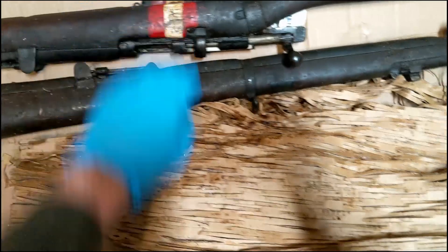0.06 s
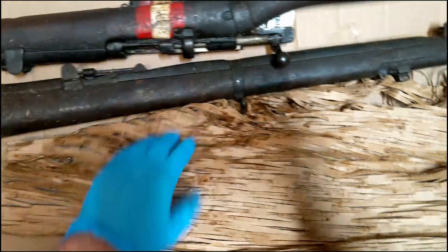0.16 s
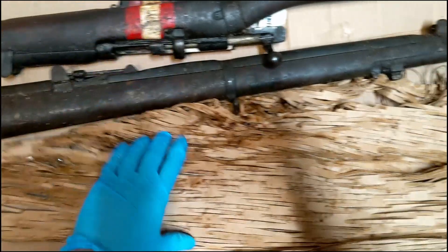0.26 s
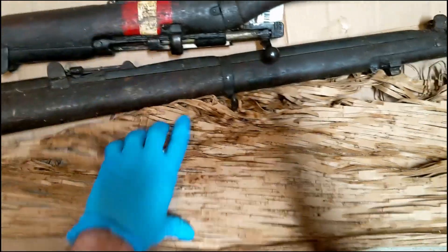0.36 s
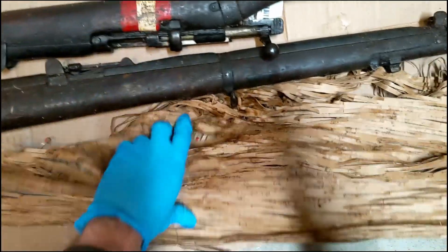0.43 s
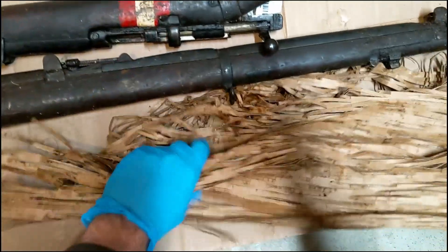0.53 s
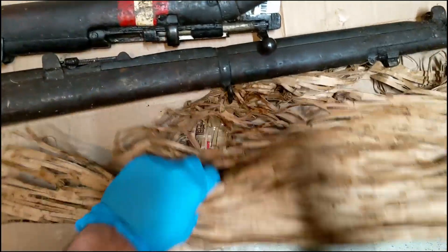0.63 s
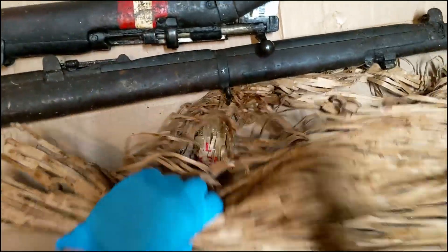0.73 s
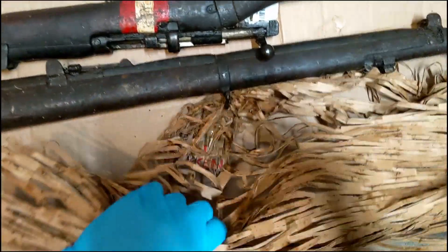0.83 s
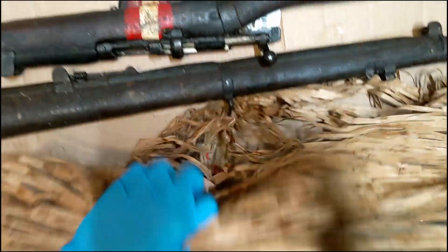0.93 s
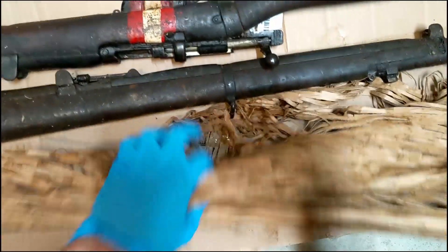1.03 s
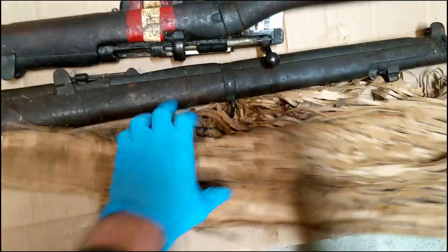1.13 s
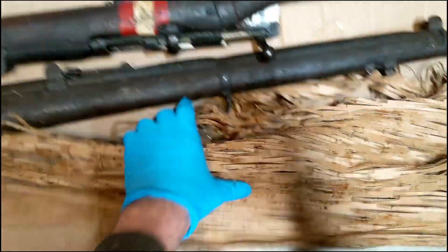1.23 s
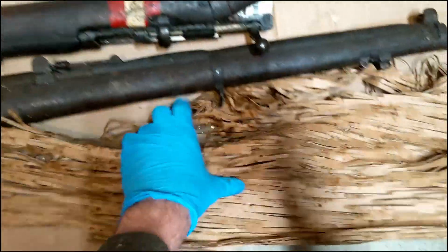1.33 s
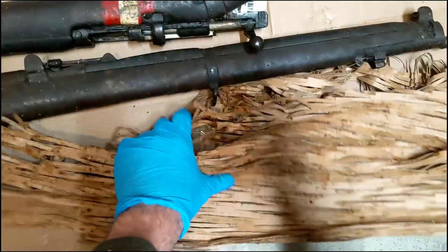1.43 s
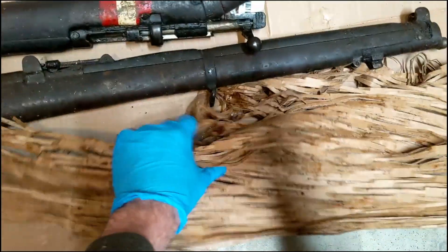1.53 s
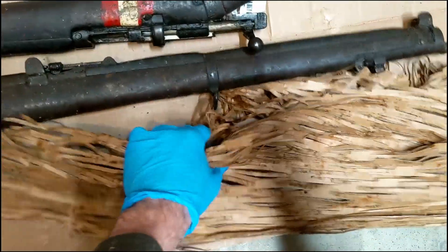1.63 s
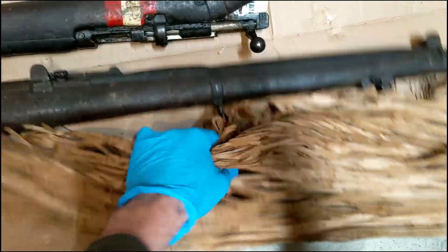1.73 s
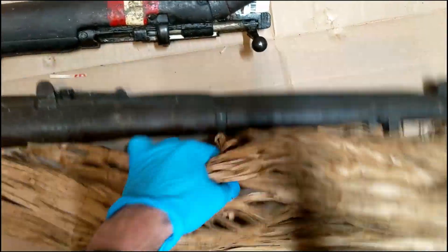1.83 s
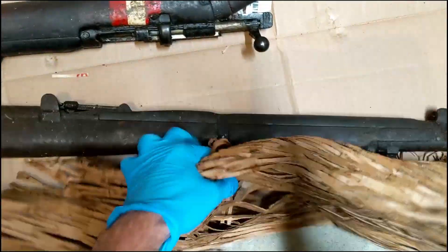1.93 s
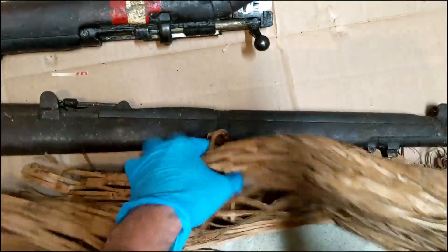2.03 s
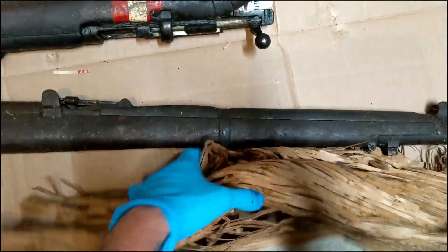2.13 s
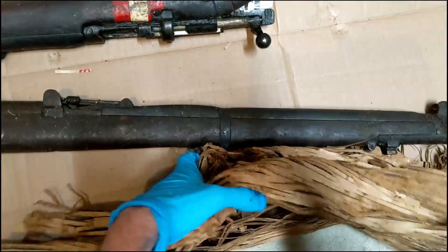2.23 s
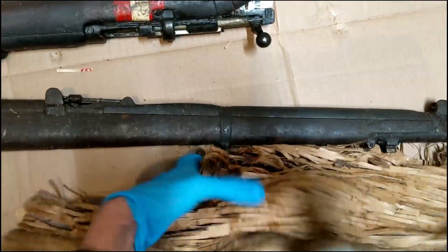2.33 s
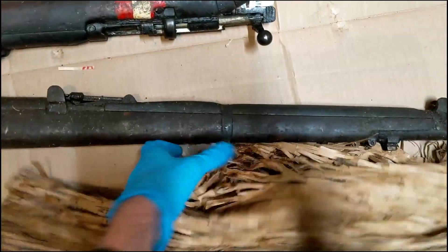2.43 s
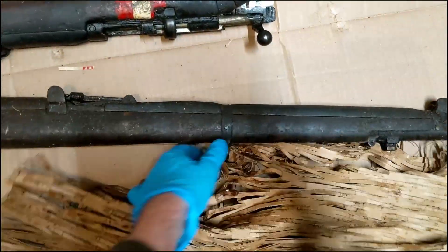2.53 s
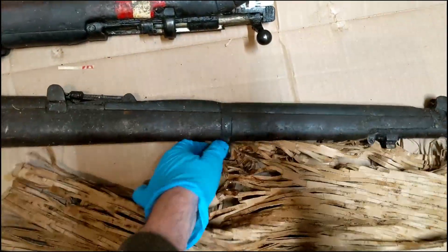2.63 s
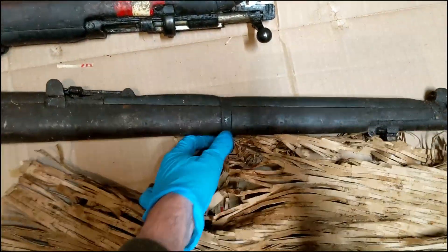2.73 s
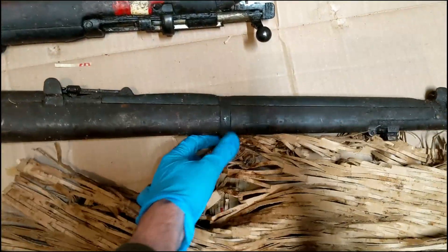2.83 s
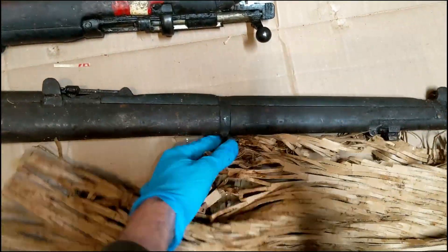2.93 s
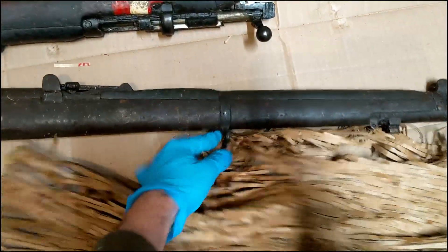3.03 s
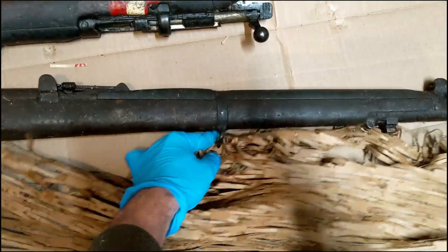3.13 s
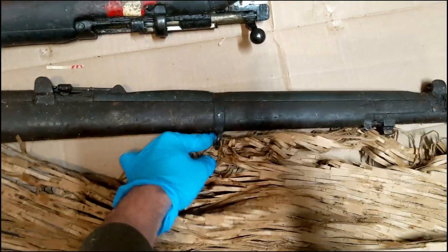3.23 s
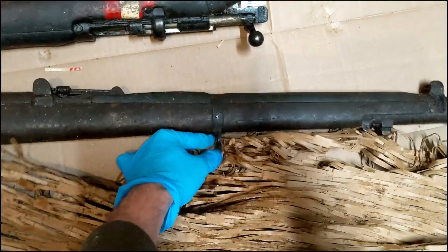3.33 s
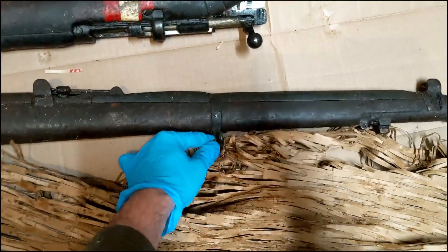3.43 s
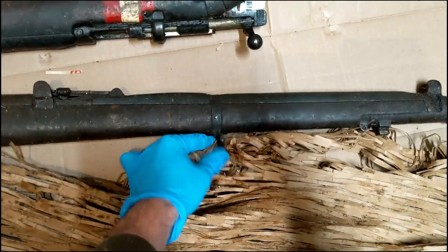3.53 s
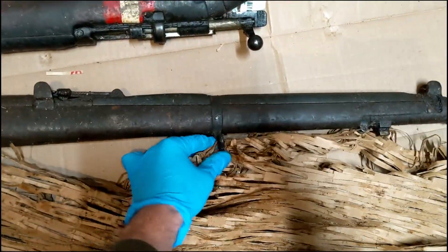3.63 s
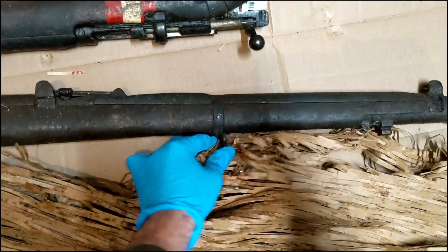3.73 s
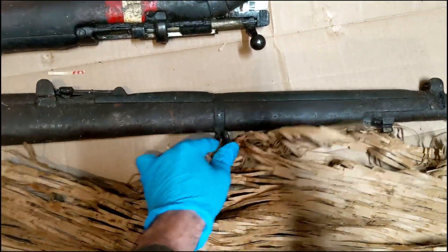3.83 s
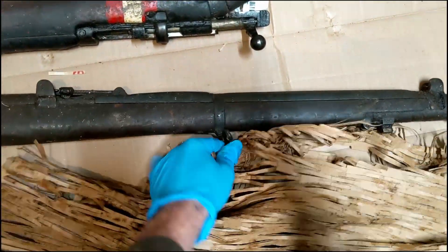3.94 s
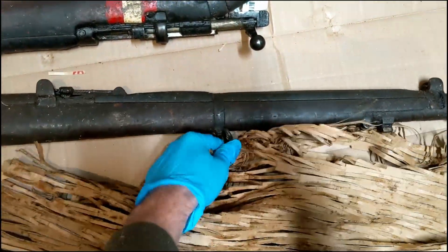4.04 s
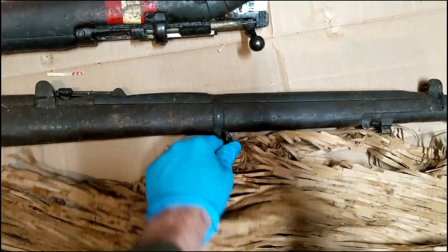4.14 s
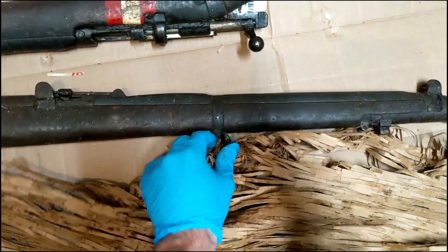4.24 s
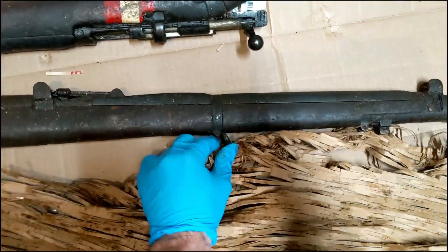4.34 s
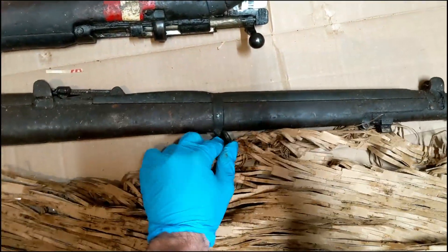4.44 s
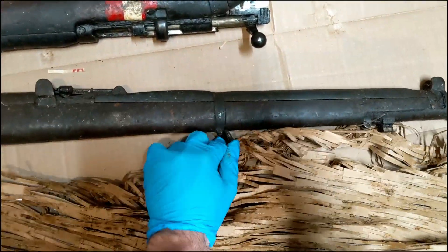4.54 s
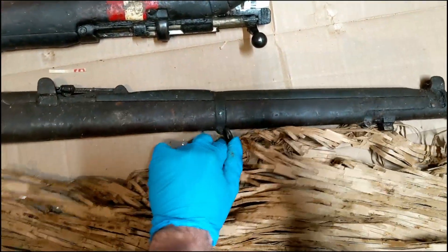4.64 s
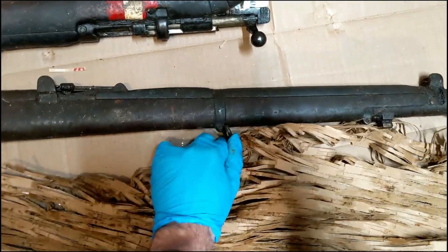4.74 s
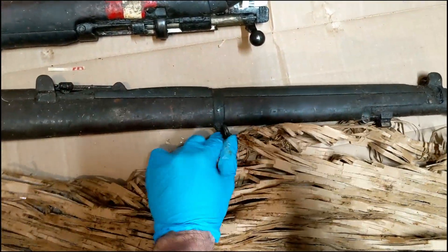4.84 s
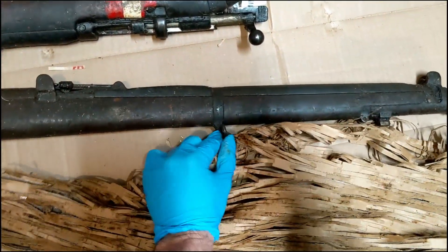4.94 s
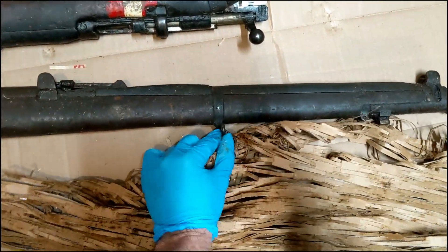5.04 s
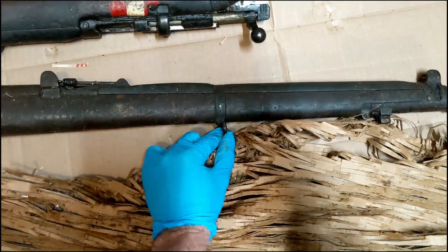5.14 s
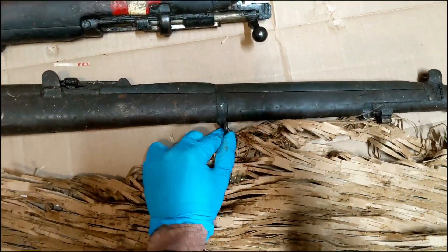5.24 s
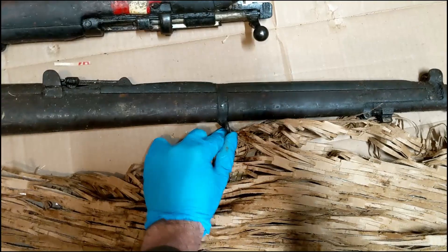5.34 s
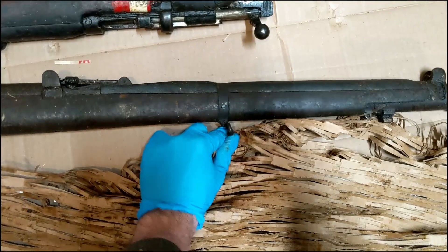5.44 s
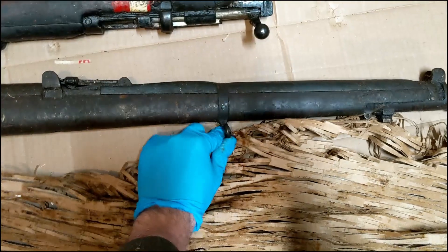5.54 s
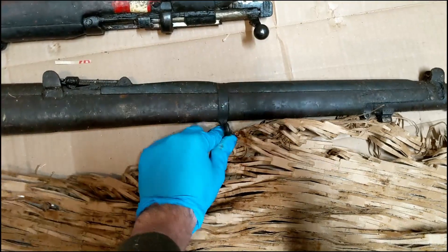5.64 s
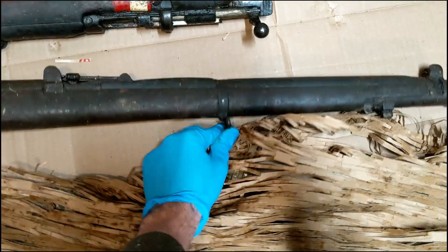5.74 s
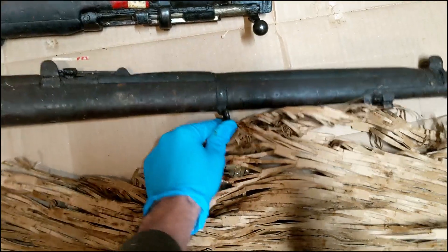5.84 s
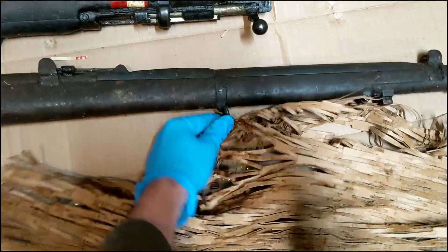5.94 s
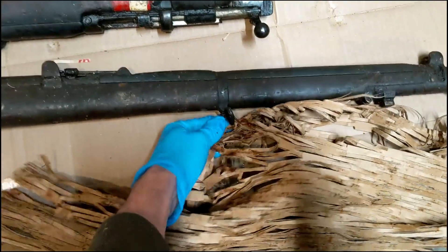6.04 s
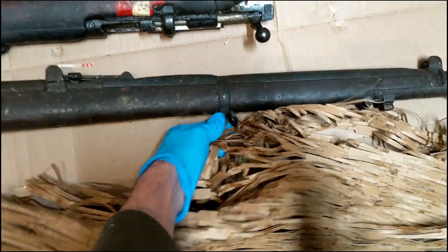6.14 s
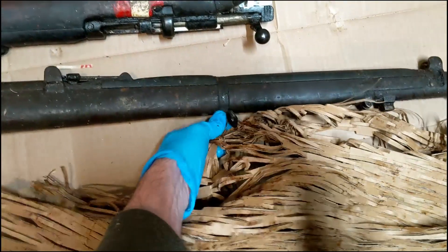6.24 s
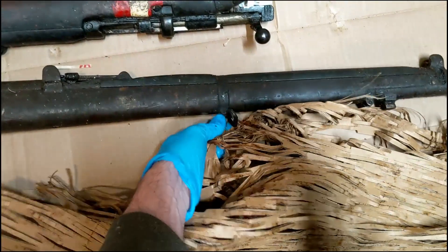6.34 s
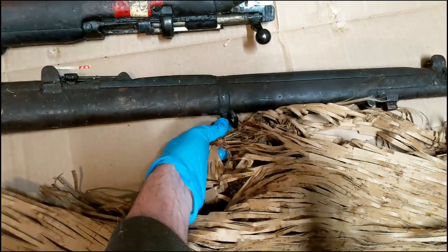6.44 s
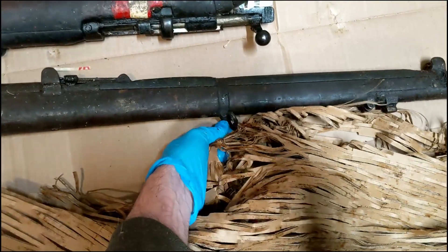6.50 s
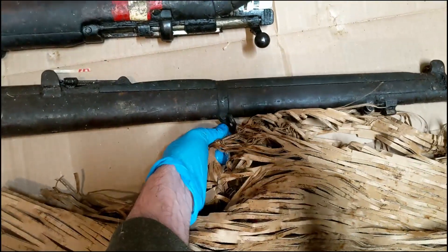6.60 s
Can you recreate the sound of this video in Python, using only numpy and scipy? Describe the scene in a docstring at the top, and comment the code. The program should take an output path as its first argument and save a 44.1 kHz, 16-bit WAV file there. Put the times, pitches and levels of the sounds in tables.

```python
"""A gloved hand pulls and pushes shredded paper packing over a cardboard sheet, near two microphones.
Strips first rustle softly over a low room rumble, a hum and a brief faint tone. At half a second they
whisper, crinkle, scuff and snap as the bundle drags and thuds on the cardboard. The loudest snaps come
near 1.7 s, then lighter strokes follow. After a lull, a sharp stroke lands near 4 s, with a second hum
now faintly there. A last busy patch comes near 6 s. The microphone housing colours it all."""
import sys
import numpy as np
from scipy import signal
from scipy.io import wavfile

SR = 44100
rng = np.random.default_rng(int(sys.argv[2]) if len(sys.argv) > 2 else 0)


def master_out(mix):
    """Clip the mix to full scale and print it as 16-bit PCM to the path in sys.argv[1]."""
    frames = np.transpose(np.atleast_2d(mix))
    ceiling = np.clip(frames, -1, 1)
    pcm = np.round(ceiling * 32767).astype(np.int16)
    wavfile.write(sys.argv[1], SR, pcm)


N = 294147


def from_db(db):
    """Turn decibels into a number to multiply by."""
    return 10 ** (np.asarray(db) / 20)


def unit_level(x):
    """Scale a sound so its average level (rms) is 1."""
    return x / np.sqrt(np.mean(x ** 2) + 1e-20)


def in_time(rows):
    """Join a table's rows with straight lines: one curve for each column after the time."""
    times_s, *columns = np.transpose(rows)
    return [np.interp(np.arange(N) / SR, times_s, column) for column in columns]


def at_hz(rows, hz):
    """Look up a table's value at a pitch, sliding between its rows."""
    pitches_hz, values = np.transpose(rows)
    return np.interp(np.log(hz), np.log(pitches_hz), values)


def drift(rate_hz):
    """A smooth random wander, about 1 in size; a higher rate wanders faster."""
    step = 40   # samples between points
    keep = np.exp(-2 * np.pi * rate_hz * step / SR)
    noise = rng.standard_normal(N // step + 2002)
    slow = signal.lfilter([1], [1, -2 * keep, keep * keep], noise)[2000:]
    return np.interp(np.arange(N) / step, np.arange(len(slow)), unit_level(slow))


def resonance(x, hz, width_hz):
    """Let through the part of a sound near one pitch, so it rings there."""
    r = np.exp(-np.pi * width_hz / SR)
    feedback = [1, -2 * r * np.cos(2 * np.pi * hz / SR), r * r]
    return signal.lfilter(np.array([1, 0, -1]) * (1 - r * r) / 2, feedback, x)


def pan(left_over_right_db):
    """Left and right gains that lean a sound to one side."""
    return from_db(left_over_right_db * np.array([[.5], [-.5]]))


def add(out, start_s, sound):
    """Mix a short sound in at a moment."""
    i = round(start_s * SR)
    out[:, i:i + sound.shape[-1]] += sound[..., :N - i]


# How alike the two microphones sound. Columns: pitch_hz, likeness (0 unrelated, 1 the same)
LIKENESS = [(30, 0.98), (60, 0.92), (130, 0.77), (640, 0.65), (1410, 0.86), (3100, 0.024), (6820, 0.0)]
# Which side is louder. Columns: pitch_hz, left_over_right_db
BALANCE = [(60, -2), (480, 0), (950, 4.5), (1890, -4.5), (3770, -2), (7520, 0), (15000, -3)]

def shaped_noise(colour, envelope, flicker_db, tilt_db=0):
    """Stereo noise in bands that each flicker; tilt_db brightens it by that much per octave."""
    low_hz, high_hz = colour[0][0], colour[-1][0]
    edges = np.geomspace(low_hz, high_hz, int(3 * np.log2(high_hz / low_hz)) + 2)
    out, white = 0, envelope * rng.standard_normal((2, 2, N))
    for k, (low, high) in enumerate(zip(edges, edges[1:])):
        band = signal.butter(2, [low, high], "band", fs=SR, output="sos")
        mid, side = signal.sosfilt(band, white[k % 2])   # neighbouring bands get unrelated noise
        hz = np.sqrt(low * high)
        octaves = np.log2(hz / np.sqrt(low_hz * high_hz))
        gain = from_db(at_hz(colour, hz) + flicker_db * drift(10.6) + tilt_db * octaves)
        alike = at_hz(LIKENESS, hz)
        stereo = np.sqrt(1 + alike) * mid + np.sqrt(1 - alike) * side * [[1], [-1]]
        out = out + gain * pan(at_hz(BALANCE, hz)) * stereo
    return out / np.sqrt(np.mean(out.mean(0) ** 2))


# The tone of the room's rumble. Columns: pitch_hz, level_db
RUMBLE_COLOUR = [(18, -8), (32, 6), (45, -10.5), (112, -1), (165, -12.5), (251, -9), (398, -27), (483, -4),
                 (577, -29), (700, -24), (910, -12)]

def room_rumble():
    """The room gives a quiet, deep noise that never stops."""
    return from_db(-60) * shaped_noise(RUMBLE_COLOUR, envelope=1, flicker_db=-0.7)


# How loud the two hums are. Columns: time_s, lower_hum_db, upper_hum_db
HUM_LEVELS = [(0, -52, -85), (.45, -57, -86), (.6, -61, -95), (3.9, -61, -66), (4.2, -62, -62.5),
              (5.7, -62, -67), (5.9, -60, -70), (6.67, -59, -66)]
HUM_HZ, HUM_WIDTH_HZ = (48.6, 94.4), 19

def hums():
    """Two low hums waver: each is noise narrowed until it is almost one note."""
    out = 0
    for hz, level_db in zip(HUM_HZ, in_time(HUM_LEVELS)):
        narrow = resonance(rng.standard_normal(N), hz, HUM_WIDTH_HZ)
        out = out + from_db(level_db) * unit_level(resonance(narrow, hz, HUM_WIDTH_HZ))
    return out


# Strips settling between strokes. Columns: time_s, whisper_db, crinkle_db
SETTLING = [(0, -60.5, -52.5), (.2, -64.5, -56.5), (.7, -47, -50), (1.1, -49.5, -53), (1.38, -55, -54.5),
            (2.7, -55.5, -52), (3.3, -54, -52), (3.601, -71, -67), (3.73, -70, -77), (4.15, -53, -51),
            (4.55, -60, -60), (5.1, -60, -59.5), (5.65, -57.5, -57.5), (6.28, -52.5, -53),
            (6.67, -61, -60.5)]
# Strokes of the hand. Columns: full_strength_s, rise_s, hold_s, whisper_db, crinkle_db, drag_db,
# crinkle_tilt_db_per_octave
STROKES = [(0.266, 0.045, 0.29, -57, -58, -57, -6), (0.49, 0.028, .01, -39, -36, -57, 4),
           (0.573, 0.043, 0.015, -41, -38, -44.5, -1), (0.616, 0.037, 0.032, -38, -37.5, -37, 3),
           (0.927, 0.033, 0.034, -55.5, -42, -46.5, 9), (1.211, 0.12, 0.12, -44.5, -46.5, -46.5, -3),
           (1.427, 0.057, 0.12, -45, -43, -38.5, -1), (1.64, 0.21, 0.026, -41.5, -51, -42, 7),
           (1.707, 0.054, 0.062, -43.5, -38.5, -38, 6.5), (1.809, 0.24, .19, -34.5, -38, -37, 5.5),
           (2.017, .05, 0.069, -61, -42, -58, -7), (2.171, 0.12, 0.042, -43, -46.5, -49, 9),
           (2.251, 0.17, 0.053, -47, -44, -73, -8), (2.39, 0.04, 0.22, -47, -44.5, -59, -2),
           (2.774, 0.14, 0.033, -49, -46.5, -55.5, -5.5), (2.994, .02, 0.032, -45, -44.5, -75, -4),
           (3.111, 0.18, 0.089, -48, -43.5, -52.5, -7), (3.413, 0.086, 0.064, -53, -50.5, -55, -5),
           (3.533, 0.012, 0.026, -57, -55.5, -66, 8), (3.874, 0.16, 0.064, -45.5, -44.5, -51.5, -3),
           (3.951, 0.052, 0.0023, -40.5, -31.5, -38.5, -1), (4.03, 0.035, 0.022, -50, -45.5, -48.5, -12),
           (4.251, 0.064, 0.026, -50, -52, -50.5, 8), (5.038, 0.058, 0.035, -73, -55.5, -63, -4),
           (5.256, 0.12, 0.12, -61.5, -56.5, -64.5, -2), (5.396, 0.048, 0.1, -51.5, -48, -61, 1),
           (5.787, 0.038, 0.047, -59, -46.5, -56, -10), (5.868, 0.22, 0.075, -52, -46.5, -49, -1),
           (6.039, 0.08, 0.09, -45.5, -39, -47.5, -4.5), (6.183, 0.008, 0.012, -44.5, -44, -47, 11),
           (6.421, 0.035, 0.04, -51, -48, -58, -5.5)]
# Each trio is for whisper, crinkle, drag.
RISE_DB, FADE_DB_PER_S = (26, 22, 24.5), (108, 86, 131)
LET_GO_DB, LET_GO_S = (3.5, 4.5, 10), 0.032   # a quick extra drop as the grip eases

def hand():
    """Strokes rise, hold and fade. Gives whisper, crinkle and drag levels, and crinkle brightness."""
    t = np.arange(0, N, 32) / SR
    times_s, whisper_db, crinkle_db = np.transpose(SETTLING)
    resting_db = [np.interp(t, times_s, db) for db in (whisper_db, crinkle_db, whisper_db - 5.5)]
    power, brightness = from_db(resting_db) ** 2, 0
    for full_s, rise_s, hold_s, *levels_db, tilt_db in STROKES:
        rise_left = np.maximum(full_s - t, 0) / rise_s
        after_s = np.maximum(t - full_s - hold_s, 0)
        shape_db = -np.outer(RISE_DB, rise_left) - np.outer(FADE_DB_PER_S, after_s)
        shape_db -= np.outer(LET_GO_DB, 1 - np.exp(-after_s / LET_GO_S))
        stroke = from_db(shape_db + np.array(levels_db)[:, None]) ** 2
        power = power + stroke
        brightness = brightness + tilt_db * stroke[1]   # the loudest crinkle counts most
    curves = (*(10 * np.log10(power)), brightness / power[1])
    return [np.interp(np.arange(N) / SR, t, curve) for curve in curves]


def grains(per_s, spread_db, clump_db, fade_s):
    """The jumpy loudness of paper buckling: tiny bursts of uneven size that come in clumps."""
    born = rng.random(N) < per_s * from_db(clump_db * drift(30)) / SR
    powers = from_db(spread_db * np.minimum(rng.exponential(1, N), 5)) ** 2
    keep = np.exp(-2 / (fade_s * SR))
    return unit_level(np.sqrt(signal.lfilter([1], [1, -keep], born * powers + 1e-9)))


def strip_clicks(per_s, spread_db, cycles):
    """Lone strips click, each ringing briefly at one of 16 pitches with its own left-right place."""
    born = (rng.random(N) < per_s * from_db(4 * drift(8)) / SR) * rng.choice([-1, 1], N)
    sizes = born * from_db(spread_db * np.minimum(rng.exponential(1, N), 3))
    pitch_number, out = rng.integers(0, 16, size=N), np.zeros((2, N))
    for k, hz in enumerate(np.geomspace(1100, 13000, num=16)):
        ring = resonance(sizes * (pitch_number == k) + 1e-18, hz, hz / cycles)
        out += pan(rng.normal(-0.44, 2.8)) * ring * np.sqrt(cycles / hz)
    return unit_level(out)


HOLLOW_HZ, HOLLOW_DB, HOLLOW_WIDTH_HZ = (953, 1323), (-6, -15.5), 310

def hollow_sheet(roughness, drag_db, drag_tilt_db):
    """The rubbed cardboard rings at two flickering pitches, more strongly when the drag is dull."""
    out, rub = 0, roughness * rng.standard_normal(N)
    for hz, level_db in zip(HOLLOW_HZ, HOLLOW_DB):
        ring = unit_level(resonance(resonance(rub, hz, HOLLOW_WIDTH_HZ), hz, HOLLOW_WIDTH_HZ))
        out = out + from_db(drag_db + level_db - 0.3 * drag_tilt_db + 2.1 * drift(22)) * ring
    return out


# The tones of the four rubbing sounds. Columns: pitch_hz, level_db
WHISPER_COLOUR = [(3500, -28), (4800, 3.5), (6000, 2.5), (9000, 4.5), (16000, 7.5)]   # fine strips brushing
CRINKLE_COLOUR = [(1100, -7), (1700, 2), (2400, 6.5), (3400, 7.5), (4200, 1.5), (5500, -11)]   # stiffer folds buckling
DRAG_COLOUR = [(450, -53), (700, 3.5), (950, -3), (1300, 5), (2200, 4)]   # paper sliding on cardboard
PUSH_COLOUR = [(100, -6), (170, -12), (260, 3), (370, 0.5), (600, 1), (850, -5.5)]   # the whole bundle being shoved
# How the rubbing changes as the grip moves.
# Columns: time_s, whisper_tilt_db_per_octave, drag_tilt_db_per_octave, extra_push_db
GRIP = [(0, -6.5, 3, -0.5), (.6, -2, -4.5, 0), (1.3, -1.5, -10, 0.5), (1.8, -3, -1, -6), (2.5, -2.5, -4, 4),
        (3.9, -5, 0.5, -1), (4.8, -2, -4, 0.5), (5.25, -3.5, 5, 3), (6.2, -2, 3.5, -1),
        (6.67, -0.5, 4.5, 0.5)]

def paper_rustle():
    """Fine strips make many small, even bursts; stiff folds and the dragged sheet fewer, rougher ones."""
    whisper_db, crinkle_db, drag_db, crinkle_tilt_db = hand()
    whisper_tilt_db, drag_tilt_db, extra_push_db = in_time(GRIP)
    push_db = -53.5 + extra_push_db + 0.85 * (drag_db + 50)   # swells and fades with the drag
    fine = grains(per_s=2500, spread_db=0.28, clump_db=2.3, fade_s=0.0097)
    coarse = grains(per_s=600, spread_db=1.5, clump_db=1.7, fade_s=0.0035)
    mixed = 0.65 * fine + 0.38 * coarse
    whisper = shaped_noise(WHISPER_COLOUR, fine, flicker_db=0.9, tilt_db=whisper_tilt_db)
    crinkle = shaped_noise(CRINKLE_COLOUR, mixed, flicker_db=1.7, tilt_db=crinkle_tilt_db)
    drag = shaped_noise(DRAG_COLOUR, coarse, flicker_db=2.5, tilt_db=drag_tilt_db)
    push = shaped_noise(PUSH_COLOUR, coarse, flicker_db=2.0)
    clicks = from_db(-9.5) * strip_clicks(per_s=160, spread_db=4.5, cycles=2.4)
    strips = from_db(whisper_db) * whisper + from_db(crinkle_db) * (crinkle + clicks)
    cardboard = from_db(drag_db) * drag + hollow_sheet(coarse, drag_db, drag_tilt_db)
    return strips + cardboard + from_db(push_db) * push


# First row: a faint background tone near 1.6 kHz for the first 0.4 s. Other rows: strips sliding.
# Columns: start_s, length_s, level_db, pitch_hz, width_hz
TONE_AND_SCUFFS = [(0.0, 0.39, -59, 1600, 190), (0.49, 0.084, -32.5, 4130, 600),
                   (2.506, 0.084, -39.5, 1630, 300), (3.11, 0.067, -37.5, 2170, 700),
                   (3.53, 0.066, -57, 1600, 80), (5.091, 0.48, -49.5, 6700, 2200),
                   (5.792, 0.059, -49, 1890, 500), (2.76, 0.084, -39, 2220, 600),
                   (4.732, 0.05, -49, 1700, 2500), (4.982, 0.011, -41.5, 3700, 2500),
                   (6.105, 0.29, -45, 1360, 300)]

def faint_tone_and_scuffs():
    """The tone and each scuff are noise around one pitch; short ones start at once, long ones swell."""
    out, t = np.zeros((2, N)), np.arange(SR // 2) / SR
    for start_s, length_s, level_db, hz, width_hz in TONE_AND_SCUFFS:
        shared, left, right = resonance(rng.standard_normal((3, len(t))), hz, width_hz)
        band = unit_level(shared + np.array([left, right]))
        swell = 1 - np.exp(-t / (.003 + .6 * length_s ** 2))
        fade = np.clip(1 - t / length_s, 0, 1) ** .5
        add(out, start_s, from_db(level_db) * swell * fade * band)
    return out


# Single strips snapping. Columns: start_s, level_db, pitch_hz, ring_cycles, tick_db
SNAPS = [(0.4963, -21.5, 4000, 11, -20), (0.581, -25, 2270, 4.9, -20), (0.6162, -20.5, 940, 2, -19),
         (0.633, -21.5, 1280, 4.3, -18), (0.642, -26, 1260, 2.1, -12), (0.646, -22, 1260, 2, -8),
         (0.667, -28, 930, 1.9, 4), (0.936, -33, 3160, 2.9, 1), (1.077, -33.5, 900, 2.5, -7),
         (1.188, -31, 1030, 3, -2), (1.632, -15, 937, 0.91, -12.5), (1.7066, -19, 1300, 1.2, -20),
         (1.7116, -14.5, 1400, 2.6, -20), (1.7166, -14.5, 1250, 3.6, -24), (1.7222, -14, 1400, 4, -22),
         (1.7304, -15, 1300, 5, -24), (1.7398, -20, 1190, 1.5, -22), (1.826, -27, 905, 4, -20),
         (1.978, -29, 950, 2.7, -20), (2.186, -42.5, 5600, 2.6, 20.5), (2.265, -31.5, 1580, 4.6, -19),
         (2.282, -30, 1980, 4.9, 1), (2.407, -34, 2000, 2.5, -1), (2.763, -31, 2170, 6, -15),
         (2.923, -35, 2310, 5.6, -22), (2.992, -49, 3000, 2.6, 20.5), (3.02, -33, 2300, 6, -6),
         (3.198, -35, 1600, 2.8, -8), (3.5222, -32, 3260, 6.6, -3), (3.5225, -29.5, 1625, 4.2, -5),
         (3.552, -40, 3330, 4, -10), (3.687, -63, 5510, 2, 21.5), (3.943, -22, 2270, 3.3, -11),
         (3.948, -24.5, 1730, 5, -11), (4.637, -38, 3330, 4.4, -8), (5.018, -29, 1720, 1.6, -13),
         (5.254, -37, 1250, 1.7, -1), (5.375, -52, 5600, 3, 18), (5.544, -56, 3300, 1.9, 25.5),
         (5.81, -31.5, 1806, 10, -27), (6.028, -24.5, 1990, 4.8, -33), (6.035, -28, 2150, 5, -28),
         (6.056, -29, 1820, 3.3, -8), (6.187, -25, 2850, 2.3, -9)]

def strip_snaps():
    """A strip buckles with a tick, a crack and a ring; a stronger tick brings more crack and overtone."""
    out, t = np.zeros((2, N)), np.arange(800) / SR
    rise = 1 - np.exp(-t / .0001)
    for start_s, level_db, hz, cycles, tick_db in SNAPS:
        tick_noise, crack_noise = rng.standard_normal((2, 2, len(t)))
        envelope = (1 - np.exp(-t * hz / 0.34)) * np.exp(-t * hz / cycles)   # builds in about a cycle
        overtone = from_db(.5 * tick_db - 7) * np.sin(2 * np.pi * 1.9 * hz * t)
        ring = from_db(2.5) * (np.sin(2 * np.pi * hz * t) + overtone) * envelope
        burst = crack_noise * np.exp(-t / 0.0014)
        crack = from_db(.5 * tick_db + 12) * resonance(burst, hz=2320, width_hz=720)
        tick = from_db(tick_db + 2.5) * np.diff(tick_noise, prepend=0) * np.exp(-t / 0.0007)
        add(out, start_s, from_db(level_db) * pan(at_hz(BALANCE, hz)) * rise * (ring + crack + tick))
    return out


# Dull bumps on the cardboard. Columns: start_s, level_db, pitch_hz
THUDS = [(0.581, -24, 358), (1.977, -29, 80), (2.553, -29, 660), (3.203, -31, 650), (4.972, -36.5, 237),
         (5.084, -27, 220), (5.839, -30, 149), (5.844, -35, 400)]

def cardboard_thuds():
    """The sheet bends under a soft blow and stops ringing in a cycle or two."""
    out, t = np.zeros((2, N)), np.arange(4000) / SR
    for start_s, level_db, hz in THUDS:
        envelope = (1 - np.exp(-t / 0.00014)) * np.exp(-t * hz / 0.99)
        add(out, start_s, from_db(level_db - 3) * np.sin(2 * np.pi * hz * t) * envelope)
    return out


ECHO_S, ECHO_DB = 0.13, -11.5   # time to fade by 60 dB; level

def room_echo(x):
    """The walls send back quick echoes, alike on both sides in the bass and unrelated in the treble."""
    t = np.arange(int(.25 * SR)) / SR
    shared, apart = rng.standard_normal((2, len(t))) * from_db(-60 * t / ECHO_S) * (t > .002)
    bass = signal.sosfilt(signal.butter(2, 1700, "low", fs=SR, output="sos"), shared - apart)
    echoes = np.array([shared, apart + bass]) / np.sqrt(np.sum(shared ** 2))
    return from_db(ECHO_DB) * signal.fftconvolve(x, echoes, axes=1)[:, :N]


def scene():
    """Paper, cardboard and a brief faint tone in a small room, over its rumble and hums."""
    direct = paper_rustle() + strip_snaps() + faint_tone_and_scuffs() + cardboard_thuds()
    return from_db(-2.5) * direct + room_echo(direct) + room_rumble() + hums()


# Pitches the microphone housing lifts or dips. Columns: pitch_hz, width_hz, boost_db
HOUSING = [(289, 102, 3.5), (958, 606, 5), (3370, 750, 5), (4800, 600, -3.5), (5683, 500, 9),
           (7630, 350, 5), (9770, 640, 7), (11680, 350, 5.5)]
CUTOFF_HZ = 15720

def record(dry):
    """The microphone housing lifts several bands and dips one; the highest treble is cut steeply."""
    for hz, width_hz, boost_db in HOUSING:
        dry = dry + (from_db(boost_db) - 1) * resonance(dry, hz, width_hz)
    treble_cut = signal.ellip(10, .5, 60, CUTOFF_HZ, fs=SR, output="sos")
    return signal.sosfilt(treble_cut, from_db(-3) * dry)


dry = scene()
out = record(dry)
master_out(out)
```